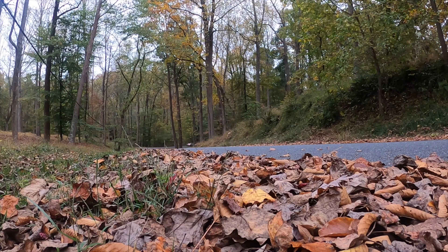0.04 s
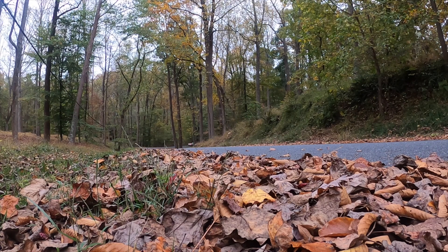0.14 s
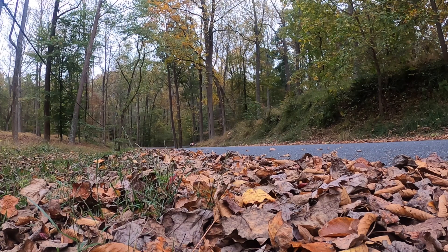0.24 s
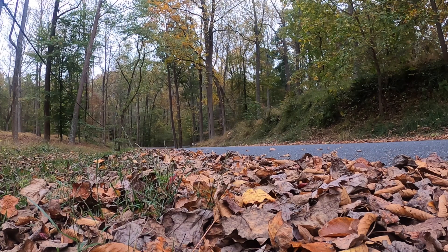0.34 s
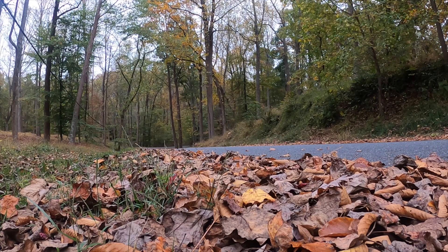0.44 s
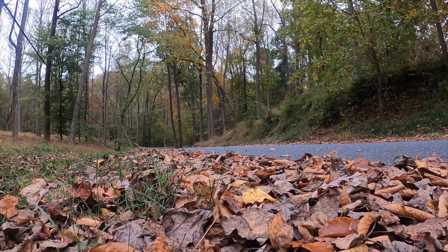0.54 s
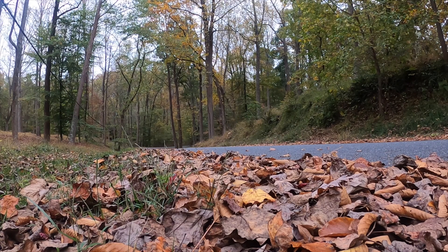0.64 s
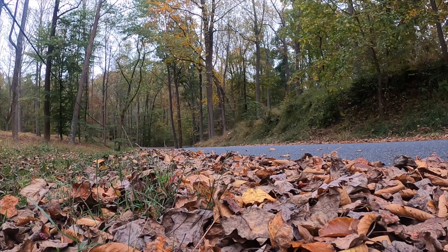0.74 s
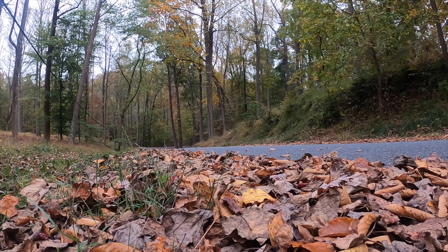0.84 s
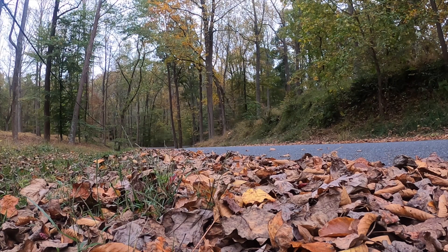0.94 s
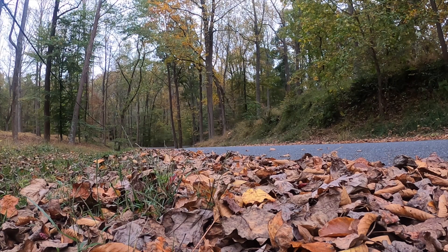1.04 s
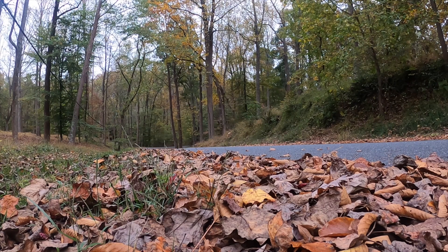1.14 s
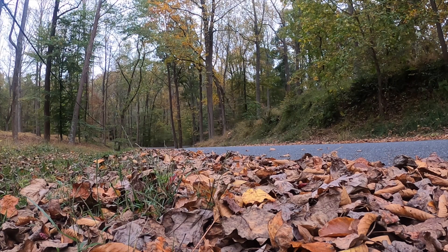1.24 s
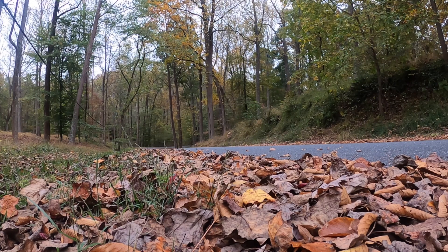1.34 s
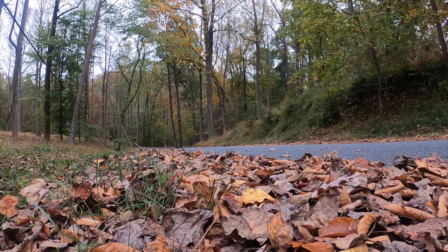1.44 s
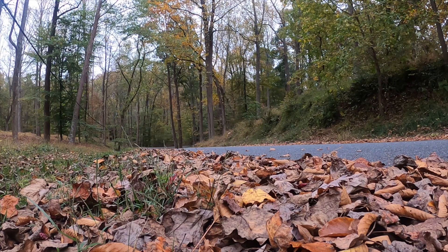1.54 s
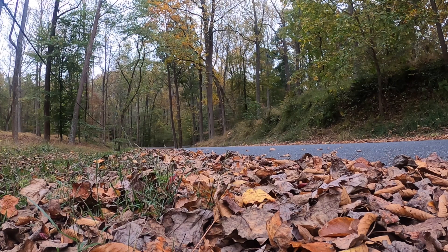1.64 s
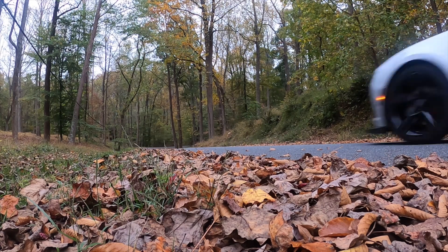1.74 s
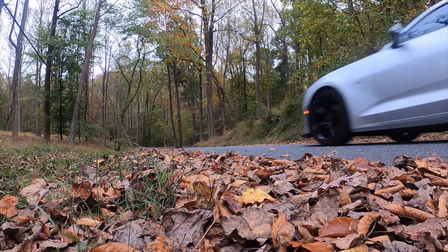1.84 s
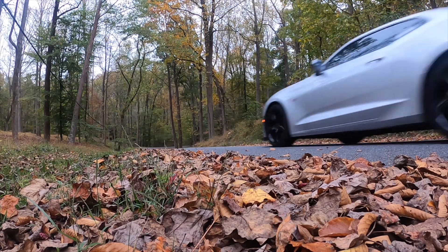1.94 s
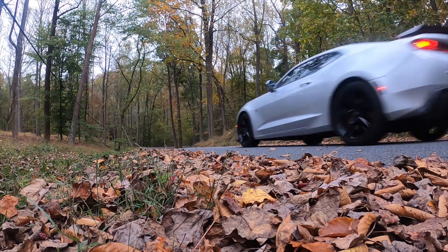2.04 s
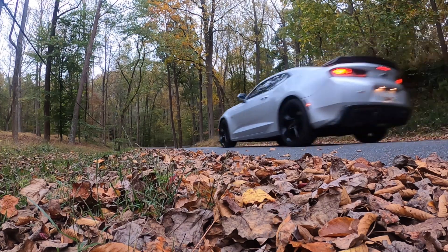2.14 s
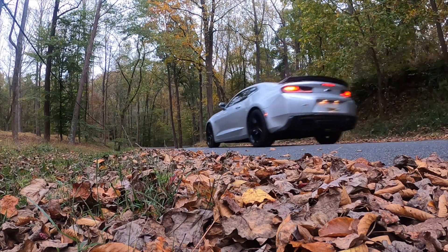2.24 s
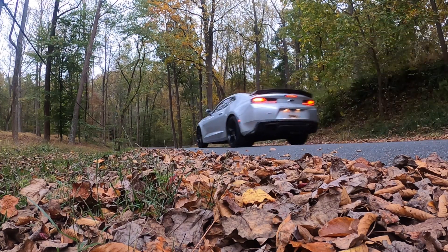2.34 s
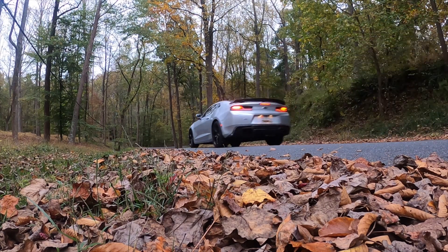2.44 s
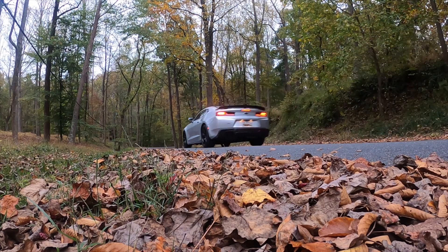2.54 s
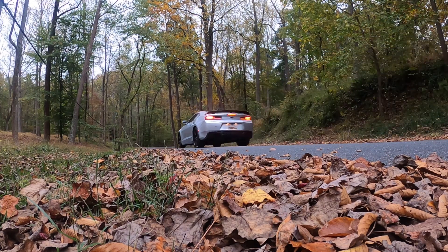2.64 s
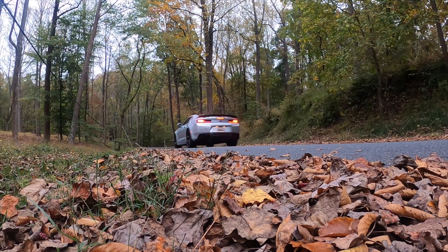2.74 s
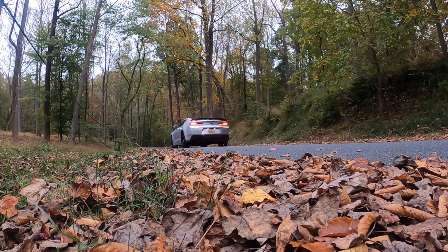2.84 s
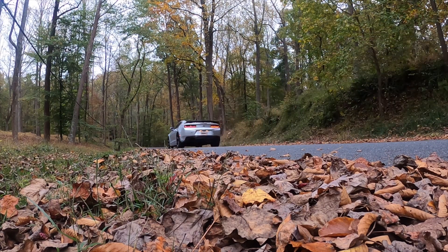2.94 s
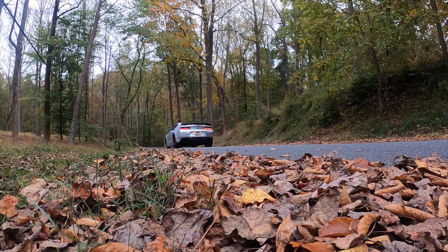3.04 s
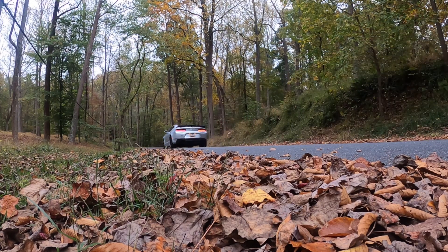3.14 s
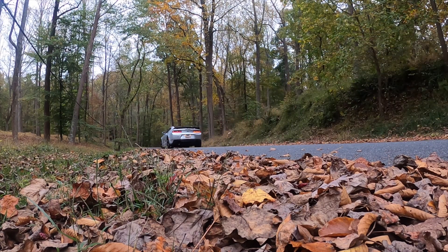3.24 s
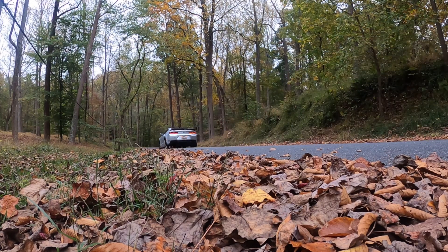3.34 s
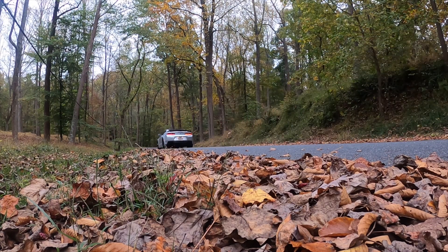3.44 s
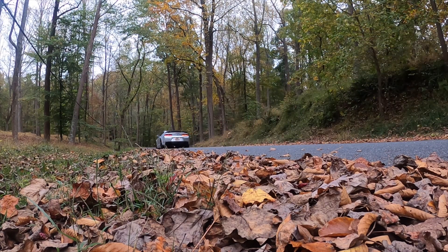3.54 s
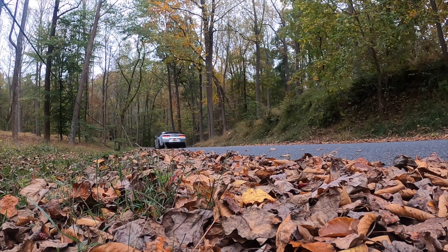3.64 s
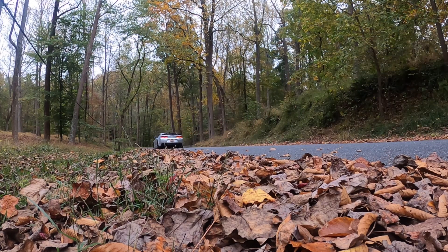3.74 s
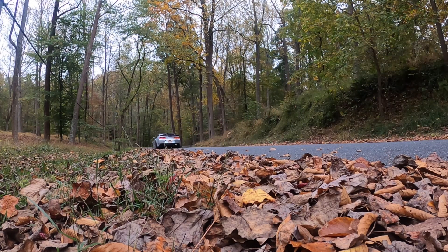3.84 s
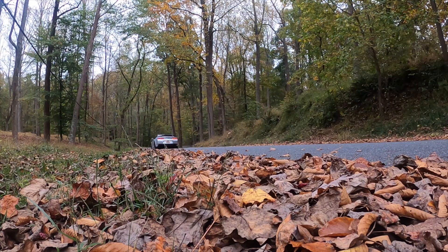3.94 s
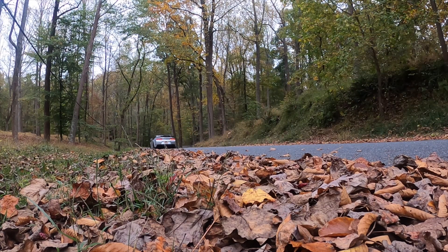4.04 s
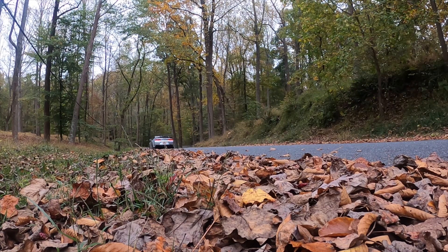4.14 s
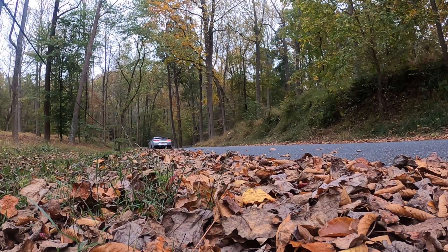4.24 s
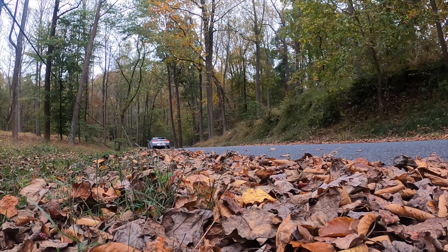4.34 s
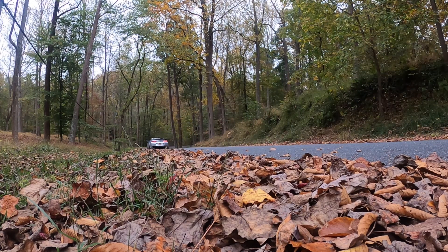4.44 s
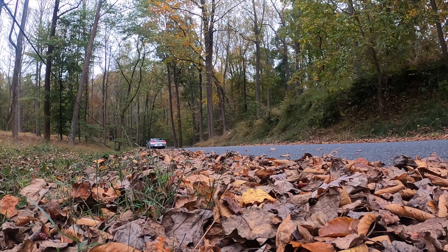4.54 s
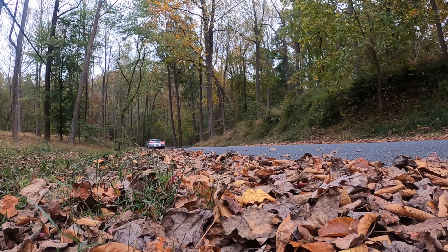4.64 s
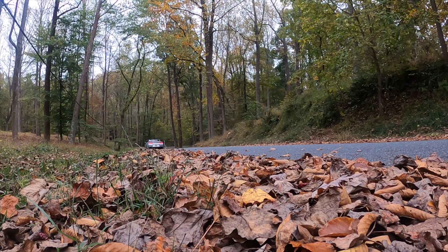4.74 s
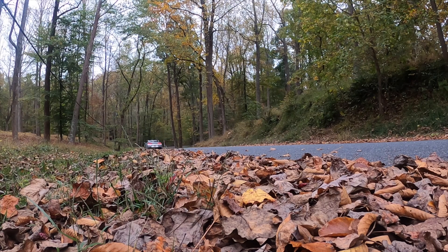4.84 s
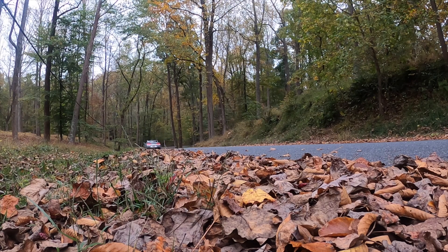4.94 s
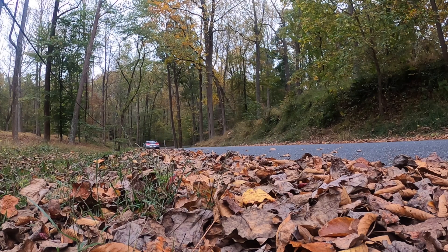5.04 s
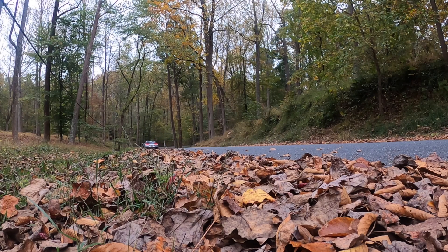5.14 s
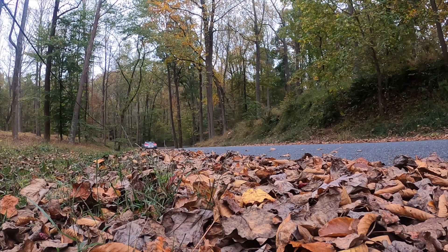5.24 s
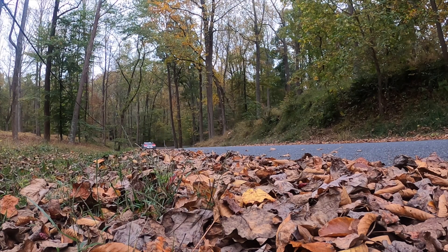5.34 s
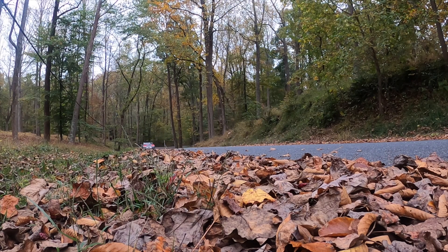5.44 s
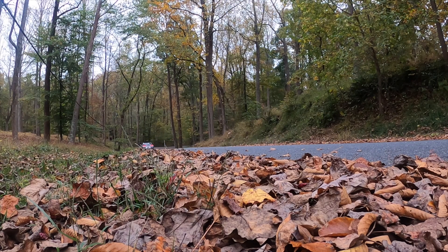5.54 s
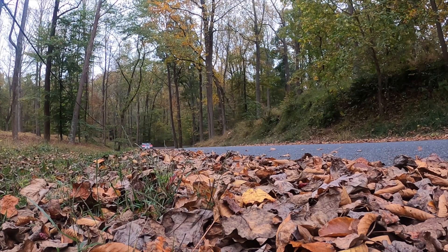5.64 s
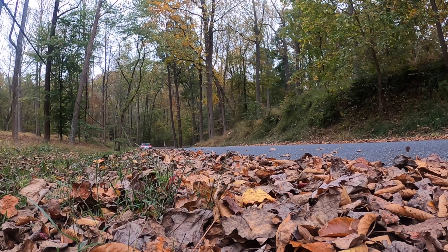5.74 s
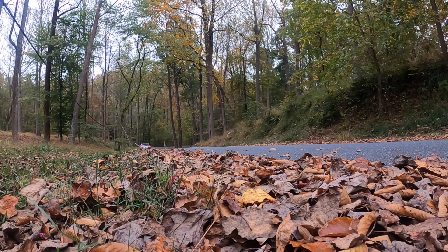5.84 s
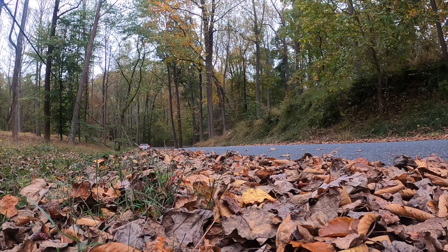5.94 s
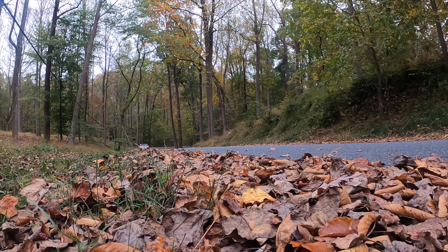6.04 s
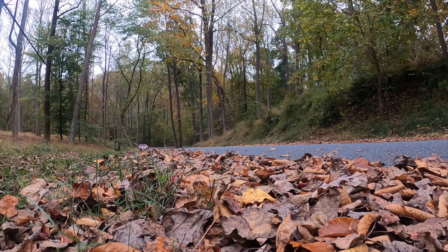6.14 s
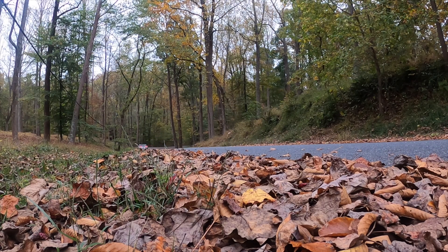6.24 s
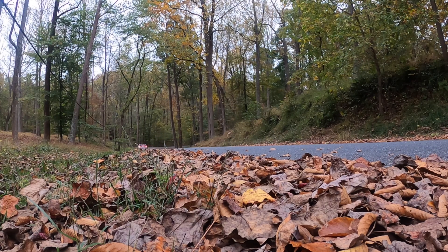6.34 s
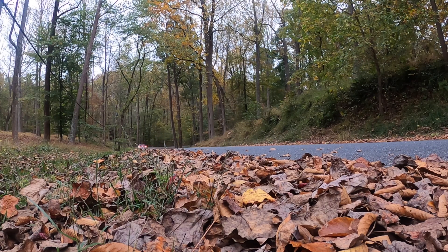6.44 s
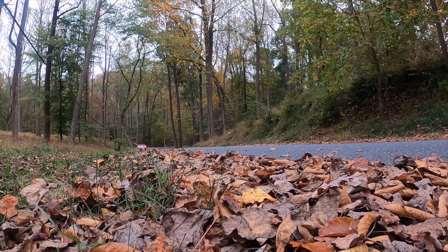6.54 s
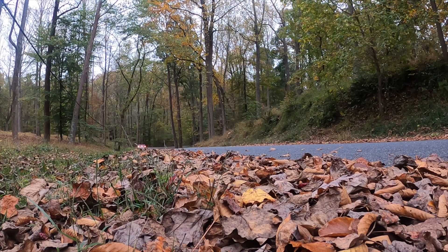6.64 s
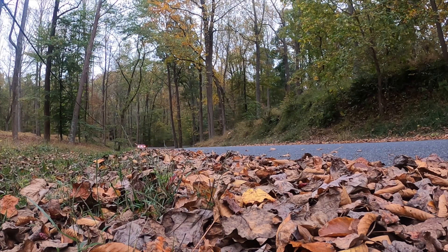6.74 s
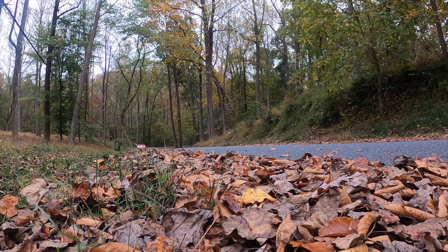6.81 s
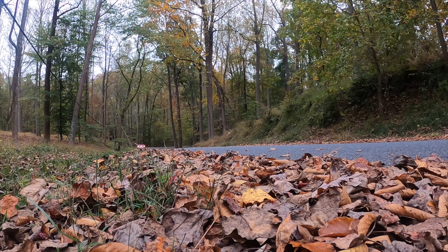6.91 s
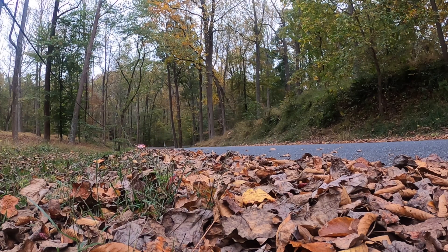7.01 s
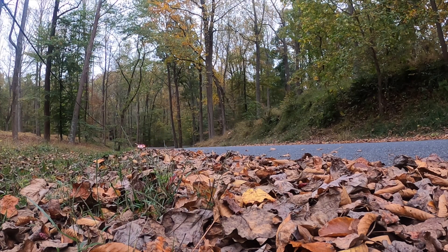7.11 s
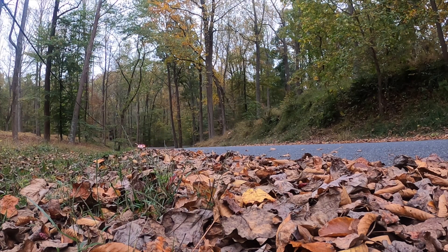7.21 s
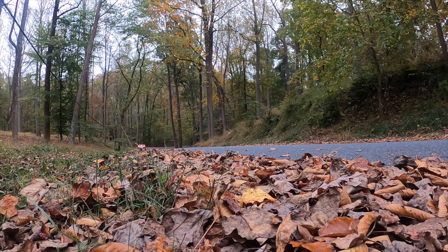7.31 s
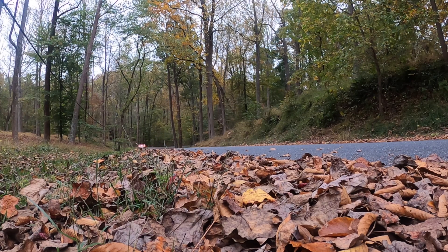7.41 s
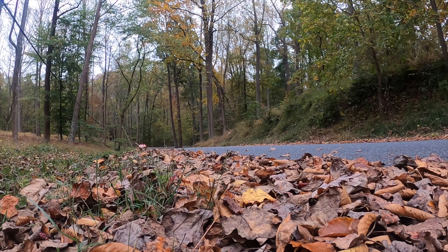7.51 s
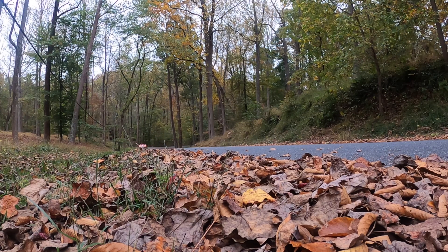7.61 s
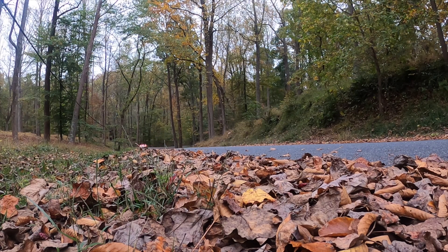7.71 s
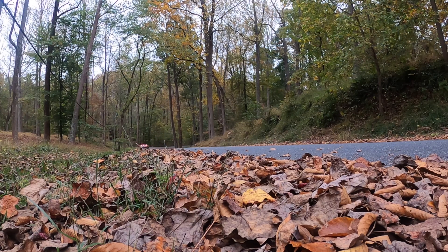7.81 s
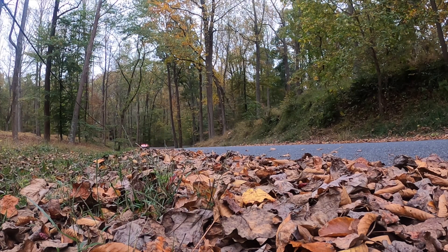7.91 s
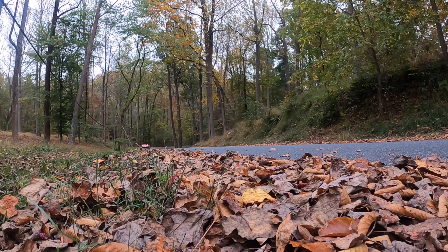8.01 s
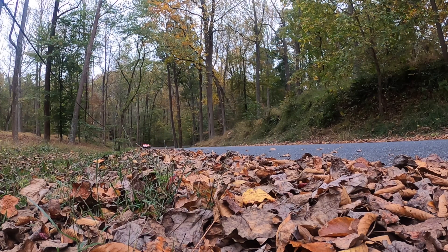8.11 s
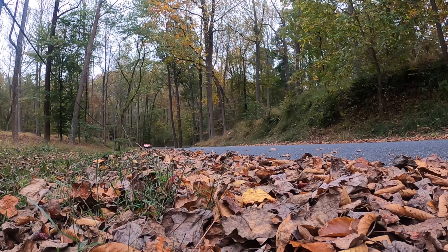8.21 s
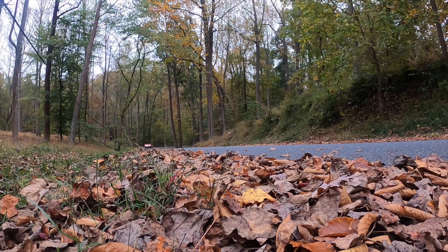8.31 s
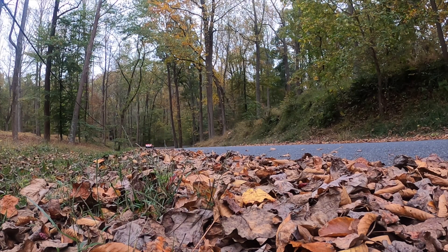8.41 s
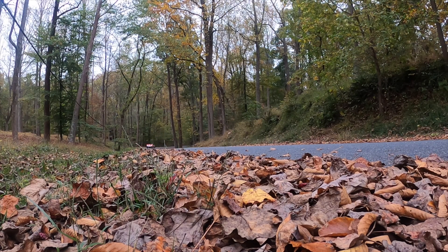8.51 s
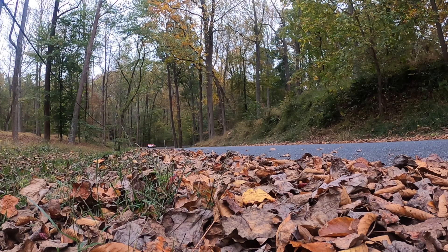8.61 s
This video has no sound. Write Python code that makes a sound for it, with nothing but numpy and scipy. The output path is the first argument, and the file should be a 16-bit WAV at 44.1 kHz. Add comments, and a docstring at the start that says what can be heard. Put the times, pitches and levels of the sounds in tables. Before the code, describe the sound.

A V8 sports car burbles up a forest road, roars past close by, shifts once, pulls away, then revs twice and pops in the distance.

```python
"""A forest road: a cross-plane V8 sports car cruises up, floors it beside a microphone lying in the leaves,
shifts up and pulls away. Far off it lifts, swells twice on the throttle, pops and burbles on the overrun.
Uneven firings make exhaust orders and burble; sharp fronts in the pipes bark, and noise puffs make gas rasp.
Tyre noise roars past, fuel thuds and cracks, short noises tick, and random decaying tails answer as the trees."""
import sys
import numpy as np
from scipy import signal
from scipy.fft import rfft, irfft
from scipy.io import wavfile
from scipy.ndimage import uniform_filter1d, map_coordinates

SR = 44100
rng = np.random.default_rng(int(sys.argv[2]) if len(sys.argv) > 2 else 0)


def store_wav(level_fs):
    """Save 16-bit WAV to argv[1]."""
    pcm = np.round(np.clip(np.atleast_2d(level_fs), -1, 1) * 32767)
    wavfile.write(sys.argv[1], SR, pcm.T.astype(np.int16))


N = 382347
TIME = np.arange(N) / SR


def undb(db):
    """Decibels to gain."""
    return 10 ** (np.asarray(db) / 20)


def curves(rows):
    """The columns of a table, joined by straight lines in time."""
    time_s, *columns = np.transpose(rows)
    return [np.interp(TIME, time_s, column) for column in columns]


def unit(x):
    """Scale to rms 1."""
    return x / np.sqrt(np.mean(x ** 2))


def steady(x, size=4410):
    """Scale to a running rms of 1; the single beats stay."""
    power = uniform_filter1d(uniform_filter1d(x ** 2, size), size // 2)
    return x / np.sqrt(power + 1e-12)


def noise():
    """White noise."""
    return rng.standard_normal(N)


def band(x, lo_hz, hi_hz, order=4):
    """Band-pass without delay."""
    sos = signal.butter(order, [lo_hz, hi_hz], "band", fs=SR, output="sos")
    return signal.sosfiltfilt(sos, x, padtype=None)


def colour(x, points, size=4096):
    """Ring x through a causal (minimum-phase) body with the given spectrum."""
    hz, db = np.transpose(points)
    f = np.arange(size // 2 + 1) * SR / size
    cepstrum = irfft(np.log(undb(np.interp(np.log(f + 1), np.log(hz), db))))
    cepstrum[1:size // 2] *= 2
    cepstrum[size // 2 + 1:] = 0
    return signal.fftconvolve(x, irfft(np.exp(rfft(cepstrum))))[:N]


def clicks(at, sizes):
    """Impulses at fractional sample positions."""
    i = np.clip(at.astype(int), 0, N - 2)
    return np.bincount(i, sizes * (1 - at % 1), N) + np.bincount(i + 1, sizes * (at % 1), N)


def fade(start_s, t60_s):
    """A sudden start that dies by 60 dB in t60_s."""
    return (TIME >= start_s) * np.exp(-np.log(1000) * np.maximum(TIME - start_s, 0) / t60_s)


def swell(centre_s, width_s):
    """A Gaussian bump in time."""
    return np.exp(-.5 * ((TIME - centre_s) / width_s) ** 2)


def ramp(start_s, length_s):
    """From 0 to 1 in a straight line."""
    return np.clip((TIME - start_s) / length_s, 0, 1)


def walk(rate):
    """Slow chance: random levels joined smoothly, rate per s, spread near 1."""
    knots = rng.standard_normal(int(N / SR * rate) + 2)
    joined = np.interp(TIME * rate, np.arange(len(knots)), knots)
    return 1.9 * uniform_filter1d(joined, int(SR / rate / 2))


def blip(top_s, rise_s, fall_s):
    """A smooth rise to 1 and fall."""
    triangle = np.interp(TIME, [top_s - rise_s, top_s, top_s + fall_s], [0, 1, 0])
    return np.sin(np.pi / 2 * triangle) ** 2


# four-stroke cycle rate, eight firings a cycle, before blips: time_s, cycle_hz
SPEED = [(0, 25.58), (1.4, 24.99), (1.72, 23.74), (1.8, 25.5), (1.95, 32.76), (2.05, 35.88), (2.11, 34.58),
         (2.27, 32.3), (2.47, 31.57), (2.78, 29.69), (2.92, 29.19), (3.2, 28.54), (3.7, 27.28),
         (4.0, 26.63), (4.3, 28.52), (4.6, 28.25), (6.15, 26.35), (6.35, 27.76), (6.6, 27.23), (7.0, 27.67),
         (8.2, 26.55), (8.67, 27)]
# throttle blips: top_s, added_cycle_hz, rise_s, fall_s, extra_level_db
BLIPS = [(5.031, 5.36, .434, .425, -9), (5.562, 14.3, .395, .491, 0.5)]


def cycle_rate():
    """Engine cycles per second; each throttle blip raises the revs and lets them fall."""
    return curves(SPEED)[0] + sum(added * blip(top, rise, fall) for top, added, rise, fall, _ in BLIPS)


# the eight firings of a cycle, late from unequal pipes: strength_db, lateness_firing_intervals
CYLINDERS = [(5, -0.019), (0, 0.13), (-2, -0.0052), (5.5, -0.058), (-0.5, .17), (-1, .1), (-4.5, -0.078),
             (0.5, 0.16)]


def firings(turns, scatter_db, jitter_s, count=8):
    """Sample position and strength of every firing, uneven by cylinder and by chance."""
    n = np.arange(int(turns[-1] * count) - 1)
    db, late = np.array(CYLINDERS)[n % count].T
    chance = rng.standard_normal((len(n), 2)).T
    at = np.interp((n + late) / count, turns, np.arange(N)) + jitter_s * SR * chance[0]
    return at, undb(db + scatter_db * chance[1])


def order_wave(turns, k, waver_rad=0.11, count=8):
    """One exhaust order near rms 1: the firing pattern sets its phase, shifting reflections make it waver."""
    cylinder_db, late = np.transpose(CYLINDERS)
    firing_angle = 2 * np.pi * k * (np.arange(count) + late) / count
    pattern = np.sum(undb(cylinder_db) * np.exp(-1j * firing_angle))
    return np.sqrt(2) * np.cos(2 * np.pi * k * turns + np.angle(pattern) + waver_rad * walk(8))


# level of the lope: time_s, level_db
LOPE = [(.14, -30.5), (.23, -25), (.68, -23), (1.1, -19), (1.65, -16.5), (1.75, -20.5), (1.83, -16.5),
        (2.6, -25), (3.1, -20), (4.05, -20), (4.3, -25.5), (4.6, -24), (4.95, -23), (5.25, -27),
        (5.52, -22.5), (5.85, -27), (6.12, -31), (6.3, -23.5), (6.52, -28.5), (6.8, -23), (7.1, -23.5),
        (8.67, -24.5)]
# level of the firing tone, the eighth order: time_s, level_db
TONE = [(1.82, -29), (1.92, -12.5), (2.02, -9.5), (2.2, -11.5), (2.48, -30.5), (3.3, -42), (4.0, -26),
        (4.13, -21), (4.62, -23.5), (4.85, -9.5), (5.05, -11), (5.22, -16), (5.4, -10), (5.55, -14.5),
        (5.72, -17.5), (6.05, -31)]
# full throttle per voice: before_shift_db, after_shift_db, fade_db_per_s, blip_db, blip_sharpness (exponent)
THROTTLE = {"honk": (-30, -31, 10, -29, 8), "bark": (-21.5, -21, 9, -29, 3),
            "blare": (-30, -33.5, 5.5, -31.5, 2.5), "rasp": (-54, -39.5, 3, -33.5, 3.5)}
# tailpipes swing towards the microphone, the narrow treble beam last, per voice: centre_s, width_s, level_db
BEAM = {"honk": (2.52, .19, -22), "bark": (2.45, .2, -37), "blare": (2.33, .23, -28.5),
        "rasp": (2.62, .16, -36.3)}
# off the throttle, per voice: tyres_at_kerb_db, distance_power, rel_to_exhaust_note_db, forest_air_db
ROLLING = {"honk": (-24, 4, -20.5, -49.5), "bark": (-27, 0.78, -27.5, -54.5),
           "blare": (-37, 0.78, -47.5, -59), "rasp": (-49.5, 0.48, -44, -62.5)}
# a blip comes down the road, then lingers among the trees: smear_s, level_db
BLIP_PATHS = [(0.028, -5.5), (.31, -4.5)]
FLOORED_S, SHIFT_S, LIFT_S, OPEN_S, CLOSE_S = 1.79, 2.089, 4.023, 0.061, 0.1
PASS_S, SPEED_M_S, KERB_M = 1.75, 20.9, 2.19
BLIP_LEAD_S, BLIP_OPEN_RATIO, BLIP_CLOSE_RATIO = .06, .65, 1.22


def blip_level(blip_db, sharp):
    """The throttle leads the revs, opens faster than they rise and closes more slowly than they fall."""
    stabs = sum(undb(blip_db + db) * blip(top - BLIP_LEAD_S, BLIP_OPEN_RATIO * up, BLIP_CLOSE_RATIO * down) ** sharp
                for top, _, up, down, db in BLIPS)
    return sum(undb(db) * signal.lfilter([1], [smear * SR, 1 - smear * SR], stabs) for smear, db in BLIP_PATHS)


def loudness(voice):
    """Level of one voice: full throttle, blips, exhaust note, tyres and forest air add up in power."""
    kick_db, pull_db, fade_db, blip_db, sharp = THROTTLE[voice]
    beam_s, beam_width_s, beam_db = BEAM[voice]
    tyre_db, falloff, note_db, air_db = ROLLING[voice]
    kick = undb(kick_db) * ramp(FLOORED_S, OPEN_S) * (1 - ramp(SHIFT_S - OPEN_S, OPEN_S))
    held = ramp(SHIFT_S - .01, OPEN_S) * np.exp(-np.maximum(TIME - LIFT_S, 0) / CLOSE_S)
    beam = undb(beam_db) * swell(beam_s, beam_width_s)
    pull = held * np.hypot(undb(pull_db - fade_db * (TIME - SHIFT_S)), beam)
    blips = blip_level(blip_db, sharp)
    distance_m = np.hypot(KERB_M, SPEED_M_S * (TIME - PASS_S))
    tyres = undb(tyre_db) * (KERB_M / distance_m) ** falloff
    note = undb(note_db) * np.hypot(undb(curves(LOPE)[0]), undb(curves(TONE)[0]))
    return np.sqrt(kick ** 2 + pull ** 2 + blips ** 2 + tyres ** 2 + note ** 2 + undb(air_db) ** 2)


# names of the ways the car is driven
DRIVES = ("cruise", "kick", "launch", "pull", "rev", "coast")
# how it is driven: time_s, drive, irregular_amplitude_share (0-1)
DRIVING = [(.5, "cruise", .7), (.8, "cruise", .45), (1.7, "cruise", .42), (1.8, "kick", .6),
           (2.04, "kick", .35), (2.2, "launch", .25), (2.6, "launch", .22), (2.9, "pull", .17),
           (3.96, "pull", .18), (4.08, "coast", .8), (4.25, "coast", .35), (4.68, "coast", .3),
           (4.78, "rev", .18), (5.62, "rev", .2), (5.9, "coast", .65), (6.6, "coast", .44),
           (7.9, "coast", .54)]


def driven(dbs):
    """A gain that follows the drive, from one dB value per drive."""
    time_s, drive, _ = zip(*DRIVING)
    return np.interp(TIME, time_s, undb([dbs[DRIVES.index(d)] for d in drive]))


# lope orders around the firing tone: cycle_rate_multiple (rounded in use), then level_db in each of DRIVES
NOTE = [(2.0, -14, -17.5, -38.5, -14, -22, -9), (3.0, -16.5, -10.5, -14, -10.0, -10.0, -13.0),
        (4.0, -15, -20, -28, -23, -10, -19.5), (5.0, -10, -2, -5.5, -4, -5.5, -8.0),
        (6.0, 1.5, -6.5, -14.5, -17, -5, -9), (7.0, -9, -7, -13, -21, -9, -12.5),
        (9.0, -11.5, -11.5, -15, -1.5, 0.5, -0.5), (10.0, -12.5, -7, -3.5, 1, -13, -0.5),
        (11.0, -1.5, -6.5, -9, -1, -1, -5.5), (11.9, -1, -5, -2.5, -3.5, 3, -1),
        (13.0, -14, -8.5, -4.5, -5.5, -2, -5.5), (14.0, -4.5, -6, -19.5, -13, -2.5, -16),
        (15.0, -22.5, -16, -6.5, -18.5, -4, -13.5), (16.0, -17, -3.5, -4.5, -9, -4.0, -8),
        (17.1, -17, -19, -9, -11, -15, -8.5), (18.0, -24.0, -13, -15, -21, -16.5, -17.5),
        (19.0, -18, -9.5, -8.5, -13.5, -13.0, -11), (20.0, -23, -11, -21.0, -7, -16, -20),
        (21.0, -14.0, -11, -15, -14.5, -25, -19)]
STUMBLE_S, STUMBLE_DB, STUMBLES_PER_S = 5.7, 1.8, 22


def lope_orders(turns, waver_db=1.5):
    """Exhaust orders of the uneven firing pattern, unsettled by shifting paths between the trunks."""
    # high orders blur most, and all blur more far away
    blur_rad = .014 + .03 * ramp(STUMBLE_S, .3) + .015 * (1 - ramp(1.5, .2))
    return sum(driven(dbs) * undb(waver_db * np.sqrt(k / 8) * walk(4))
               * order_wave(turns, round(k), waver_rad=k * blur_rad) for k, *dbs in NOTE)


# muffler spectrum: freq_hz, density_db_per_hz
BURBLE = [(24, -30.5), (40, -1.5), (108, -11), (144, -6.5), (251, -3), (302, -3.5), (329, -4), (431, -4.5),
          (689, -18.5), (740, -27), (1200, -45.5), (1560, -75.5), (2640, -120)]


def muffler_burble(turns):
    """Firings of random size and sign ring through the muffler."""
    at, size = firings(turns, scatter_db=0.5, jitter_s=0.00024)
    return colour(clicks(at, size * rng.standard_normal(len(at))), BURBLE)


# exhaust shudders when the load changes: start_s, level_db, t60_s
SHUDDERS = [(.2, -22.5, 2.4), (2.075, -27, .3), (4.079, -26.5, 2.6)]
RUMBLE_DB, RUMBLE_UP_TO_HZ, RUMBLE_DB_PER_HZ, RUMBLE_LEAST_DB = -36.5, 26.8, 5, -55.5


def rumble(flow, rough, hz):
    """The lowest exhaust flow; it thins as the engine speeds up and shudders when the load changes."""
    wave = steady(band(flow, 40, 72) + 0.052 * rough * unit(band(noise(), 24, 45, order=2)), size=8820)
    level_db = np.clip(RUMBLE_DB - RUMBLE_DB_PER_HZ * (hz - RUMBLE_UP_TO_HZ), RUMBLE_LEAST_DB, RUMBLE_DB)
    shudder = sum(undb(db) * fade(start, t60) for start, db, t60 in SHUDDERS)
    return np.hypot(undb(level_db), uniform_filter1d(shudder, size=1764)) * wave


# an order flares sweeping through a pipe resonance: centre_s, cycle_rate_multiple, width_s, level_db
FLARES = [(.2, 21, 0.72, -39.5), (0.419, 4, 0.21, -28.5), (1.3, 12, 0.21, -25), (1.65, 12, 0.05, -18),
          (1.82, 16, 0.062, -20), (2.281, 10, 0.1, -27.5), (2.62, 17, 0.076, -30.5),
          (2.76, 8, 0.065, -28.5), (4.8, 16, 0.036, -25.5), (4.82, 11, 0.062, -27), (4.83, 19, .06, -34.5),
          (5.55, 7, .11, -30), (7, 10, 0.17, -33)]
# overtones relative to the lope: level_db in each of DRIVES
HONK_DB = (-11.5, -4.5, -13, -9, -3.5, -9)


def exhaust(hz, turns, order=8):
    """Firing tone, flares, lope and its honk, and rumble; off the throttle uneven firing makes it stumble."""
    time_s, _, rough = zip(*DRIVING)
    rough = np.clip(np.interp(TIME, time_s, rough), 0, .95)
    flow = np.sqrt(1 - rough ** 2) * steady(lope_orders(turns)) + rough * steady(muffler_burble(turns))
    flow = flow * undb(STUMBLE_DB * ramp(STUMBLE_S, 0.23) * walk(STUMBLES_PER_S))
    lope = undb(curves(LOPE)[0])
    honk = np.hypot(driven(HONK_DB) * lope, loudness("honk"))
    tone = undb(curves(TONE)[0]) * order_wave(turns, order)
    flares = sum(undb(db) * swell(centre, width) * order_wave(turns, round(k))
                 for centre, k, width, db in FLARES)
    lows = lope * steady(band(flow, 66, 375.7, order=6))
    mids = honk * steady(band(flow, 409.0, 800, order=6))
    return tone + flares + lows + mids + rumble(flow, rough, hz)


# tyre noise spectrum: freq_hz, density_db_per_hz
TYRES = [(500, -4), (850, 4), (1300, -8.5), (1900, -10.5), (2700, -21.5), (3500, -27.5), (4300, -34),
         (6500, -44.5), (9500, -54.5), (14000, -67)]


def tyre_roar():
    """Coloured noise; a fine sizzle in it swells during the approach, around 1.1 s."""
    road = colour(noise(), TYRES)
    return road + 1.3 * swell(1.1, 0.58) * band(road, 6000, 15000, order=2)


# tailpipe spectrum: freq_hz, density_db_per_hz
PIPE = [(400, -19), (700, -2), (800, -0.5), (900, 0.5), (985, 2), (1080, -0.5), (1240, -1.5), (1380, -9),
        (1750, -9.5), (2150, -16), (2700, -30.5), (4000, -54.5)]


def pipe_clatter(turns, trips_s=(.0023, .0037), echo=0.57):
    """Each pulse runs up and down the pipes (all-pass loops) and leaves them as a short train."""
    x = clicks(*firings(turns, scatter_db=1.3, jitter_s=.00004))
    for trip_s in trips_s:
        loop = np.r_[1, np.zeros(int(trip_s * SR)), echo]
        x = signal.lfilter(loop[::-1], loop, x)
    return colour(x, PIPE)


# steep front of each of the eight firings; one cylinder snaps hardest, another half a cycle later: level_db
FRONT_DB = (0, -8, -9, -18, -4, -11, -16, -18)
FRONT_SCATTER_DB, FRONT_DECAY_S, PUFF_DECAY_S = .8, .0012, .007  # decays: time constants of the power


def jet_gas(turns, pulsed):
    """Each firing's front snaps out of the pipe, and a puff of gas trails it."""
    at, _ = firings(turns, scatter_db=0, jitter_s=.00006)
    size = undb(np.resize(FRONT_DB, len(at)) + FRONT_SCATTER_DB * rng.standard_normal(len(at)))

    def burst(decay_s):
        """Noise that starts with every front and dies away."""
        power = signal.lfilter([1], [1, -np.exp(-1 / (decay_s * SR))], clicks(at, size ** 2))
        return unit(noise() * np.sqrt(power))

    snap = .6 * burst(FRONT_DECAY_S) + .33 * unit(clicks(at, size))
    return burst(PUFF_DECAY_S) + pulsed ** 2 * snap


# gas spectra, close by and far off: freq_hz, density_db_per_hz
GAS = [(1400, 10.5), (2150, 4.5), (2700, -8.5), (3400, -1.5), (3900, -2.5), (4200, -12.5), (5000, -8.5),
       (5600, -13.5), (7800, -18.5), (9500, -22), (10800, -35.5), (15000, -43)]
FAR_GAS = [(1400, 7), (2500, 4.5), (3700, 0), (4300, -5.5), (5100, -8), (5700, -12), (7700, -18.5),
           (10000, -32.5), (15000, -58.5)]


def gas_rasp(turns, pulsed, roar, rasp_db):
    """Distance dulls the jet and the trees blur its puffs; far off, a harder jet is brighter."""
    gas = jet_gas(turns, pulsed)
    far = ramp(2.65, 0.76)
    gas = (1 - far) * colour(gas, GAS) + far * colour(gas + 3 * roar ** 2 * noise(), FAR_GAS)
    bright_db = far * np.clip(.6 * (rasp_db + 44), -4, 6)
    return gas + (undb(bright_db) - 1) * band(gas, 4700, 15000, order=2)


# overtones ringing in the tailpipes under load: cycle_rate_multiple, near_db, far_db
BARK = [(22.0, 1.5, -2.5), (23.0, -0.5, -6.5), (24.0, -15.5, -0.5), (25.0, -17.5, 0.0), (26.0, -7.5, -0.5),
        (27.0, -13, -10.5), (28.0, -8.5, -10), (29.0, -6.0, -6.5), (30.0, 1, -9.5), (31.0, 2, 1.5),
        (32.0, -4.5, -7), (33.0, -3.5, -6), (34.0, -10, -9), (35.0, -6, -5.5), (36.0, -11, -20),
        (37.0, -5, -4), (38.0, -7, -15), (39.0, -12.5, -7.5), (40.0, -7.5, -6.5), (41.0, -4, -6.5),
        (42.0, -14, -3)]


def overtones(turns):
    """The high orders of a hard pull; their balance shifts as the car recedes."""
    far = ramp(2.476, .35)
    return sum((undb(near_db) * (1 - far) + undb(far_db) * far) * undb(2 * walk(5))
               * order_wave(turns, round(k), waver_rad=0.57) for k, near_db, far_db in BARK)


# smooth roar of tyres and trees: time_s, amplitude_share (0-1)
ROAR = [(1.76, 1), (1.86, .5), (2.3, .22), (3.9, .25), (4.3, .66), (4.85, .5), (5.55, .5), (6.1, .89)]


def edge(turns):
    """Sharp pulse fronts bark in the tailpipes, gas rasps after each, and the tyres roar underneath."""
    rasp = loudness("rasp")
    rasp_db = 20 * np.log10(rasp)
    roar = np.clip(curves(ROAR)[0], 0, .98)
    pulsed = np.sqrt(1 - roar ** 2)
    pipe, road = pipe_clatter(turns), tyre_roar()
    gas = gas_rasp(turns, pulsed, roar, rasp_db)
    # gas takes over from road hiss where it grows loud, less so before the upshift
    jet = np.clip((rasp_db + 58) / 10, .03, 1) * np.clip((TIME - 2.06) / 0.059, .25, 1)

    def hiss(lo_hz, hi_hz):
        """Gas and road noise in one band."""
        gas_part = np.sqrt(jet) * steady(band(gas, lo_hz, hi_hz))
        return gas_part + np.sqrt(1 - jet) * steady(band(road, lo_hz, hi_hz))

    # in the long pull the pipes settle on their overtones
    settled = .8 * ramp(SHIFT_S, .1) * (1 - ramp(LIFT_S, .1))
    brass = np.sqrt(settled) * steady(overtones(turns)) + np.sqrt(1 - settled) * steady(band(pipe, 640, 1400))
    bark = pulsed * brass + roar * steady(band(road, 650, 1430))
    blare = 0.42 * pulsed * steady(band(pipe, 1400, 2700)) + np.sqrt(1 - .5 * pulsed ** 2) * hiss(1348, 2580)
    return loudness("bark") * bark + loudness("blare") * blare + rasp * hiss(2655, 12000)


# dry ticks, one at the upshift, two late among the leaves: start_s, level_db
TICKS = [(2.092, -45), (8.036, -52), (8.506, -41.5)]


def buffet_stir_and_ticks():
    """The car's bow wave buffets the microphone; a dry tick at the upshift, two late; leaves stir once."""
    buffet = undb(-17.5) * swell(1.78, 0.025) * steady(band(noise(), 25, 95, order=2))
    ticks = sum(undb(db) * fade(start, 0.014) for start, db in TICKS)
    stir = undb(-58) * swell(8.01, .05) * unit(band(noise(), 2700, 4100, order=2)) * undb(2 * walk(90))
    return buffet + stir + ticks * unit(band(noise(), 2700, 6000, order=2))


# thuds at the upshift and on the overrun: start_s, relative_db
POPS = [(2.089, -20), (6.331, -21), (6.352, -20.5), (6.443, -28), (6.742, -24), (6.865, -30), (6.918, -16),
        (7.192, -21), (7.465, -19), (7.748, -18), (7.844, -15.5), (7.923, -17), (8.033, -16), (8.11, -20),
        (8.183, -27), (8.222, -29), (8.273, -23), (8.509, -22.5), (8.605, -23.5)]


def thuds():
    """Unburnt fuel thuds in the muffler: a push and a short flutter."""
    start_s, db = np.transpose(POPS)
    push = 6.5 * clicks(start_s * SR, undb(db))
    flutter = 0.68 * noise() * sum(undb(db) * fade(start, 0.16) for start, db in POPS)
    thud = colour(push + flutter, BURBLE) / np.std(colour(noise(), BURBLE))
    return undb(2.5) * band(thud, 99, 1100, order=2)


# cracks from the tailpipe: start_s, relative_db, t60_s
BACKFIRES = [(6.332, -44, 0.65)]
# a crack comes down the road and again off the bank: lag_s, level_db
CRACK_PATHS = [(0, 3), (0.046, -4.5)]
# crack spectrum: freq_hz, density_db_per_hz
CRACK = [(400, -27), (900, -1.5), (1400, -7.5), (3400, -6), (4500, -14.5), (6500, -20.5), (9000, -41),
         (12000, -69)]
SNAP_DB, SNAP_T60_S = 3.5, 0.027  # sharp front


def cracks():
    """Some charges crack with a sharp front, and the crack lingers among the trees."""
    level = sum(undb(db + path_db) * fade(start + lag, t60)
                for start, db, t60 in BACKFIRES for lag, path_db in CRACK_PATHS)
    snap = sum(undb(db + SNAP_DB) * fade(start, SNAP_T60_S) for start, db, _ in BACKFIRES)
    return (level + snap) * unit(colour(noise(), CRACK))


# after some thuds a tailpipe rings: start_s, level_db
RINGS = [(7.47, -39), (8.036, -37)]
RING_HZ, RING_T60_S = 760, 0.25


def tailpipe_rings():
    """Narrow noise at the pipe's pitch, struck and dying away."""
    level = sum(undb(db) * fade(start, RING_T60_S) for start, db in RINGS)
    ring = level * steady(band(noise(), RING_HZ - 20, RING_HZ + 20, order=2))
    return band(ring, 500, 1100, order=2)


def forest(x, t60_s, low_db, high_db, leaves_db):
    """Trunks and the leaves in front scatter sound: both ports share one tail, each adds its own treble."""
    def scatter(start_s, decay_s):
        """One random tail."""
        tail = (noise() * fade(start_s, decay_s))[:SR]
        return signal.fftconvolve(x, tail / np.linalg.norm(tail))[:N]

    leaves = np.array([scatter(.001, .14) for _ in range(2)])
    trunks = np.array([scatter(0.0093, t60_s) for _ in range(2)])
    ports = undb(high_db) * trunks + undb(leaves_db) * leaves
    treble = signal.sosfilt(signal.butter(2, 2200, "high", fs=SR, output="sos"), ports)
    return undb(low_db) * scatter(0.019, t60_s) + treble


# bearing of the car: time_s, left_minus_right_db, left_lag_samples
BEARING = [(1.5, 0.2, 1.34), (2.2, -2.3, 1.66), (3, -1.1, 1.714), (5, -0.8, 1.6), (8.67, -0.4, 0.79)]
# tailpipes aim down the open road at the microphone, so the trees answer less: centre_s, width_s, level_db
CLEAR_VIEW = (3.3, .6, -6)


def scene():
    """The car on its way past, with the ignition cut briefly for the upshift."""
    hz = cycle_rate()
    turns = np.cumsum(hz) / SR
    cut = np.exp(-((TIME - SHIFT_S) / .015) ** 4)
    pops = thuds() + tailpipe_rings() + cracks()
    car = (exhaust(hz, turns) * undb(-16 * cut) + edge(turns) + pops) * ramp(0, .02)
    view_s, view_width_s, view_db = CLEAR_VIEW
    scattered = car * undb(view_db * swell(view_s, view_width_s))
    pan_db, lag = curves(BEARING)
    left = map_coordinates(car, [np.arange(N) - lag], order=3, mode="nearest")
    answer = forest(scattered, t60_s=0.57, low_db=-11.5, high_db=-4, leaves_db=-3.5)
    ports = np.array([left, car]) + answer
    return ports * undb(np.array([pan_db, -pan_db]) / 2) + buffet_stir_and_ticks()


TOP_HZ = 15200


def record(dry):
    """The very loudest peaks are rounded and the treble is cut above TOP_HZ."""
    rounded = dry / (1 + np.abs(dry / .95) ** 8) ** (1 / 8)
    return signal.sosfilt(signal.ellip(8, .2, 70, TOP_HZ, fs=SR, output="sos"), rounded)


dry = scene()
out = record(dry)
store_wav(out)
```